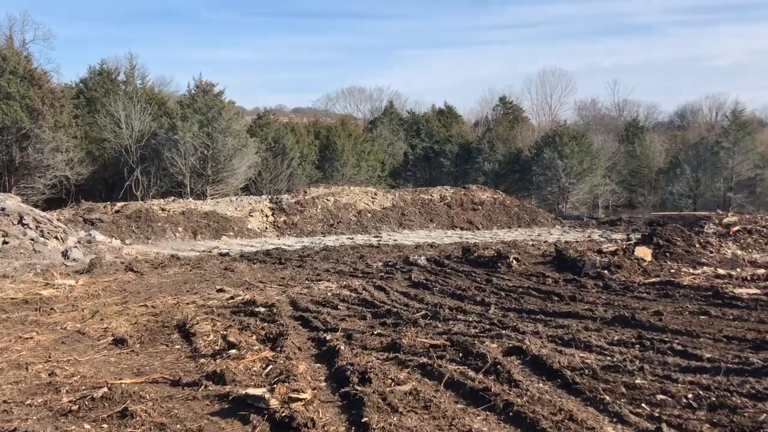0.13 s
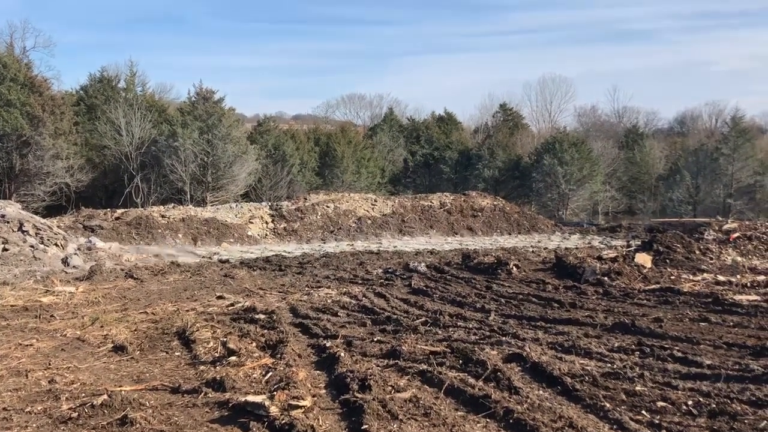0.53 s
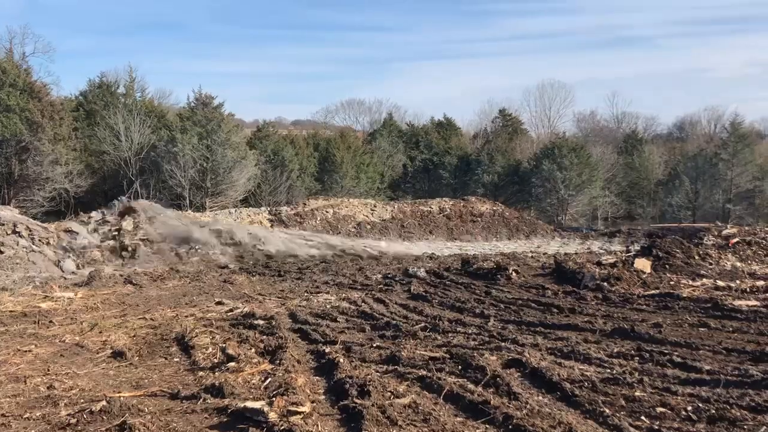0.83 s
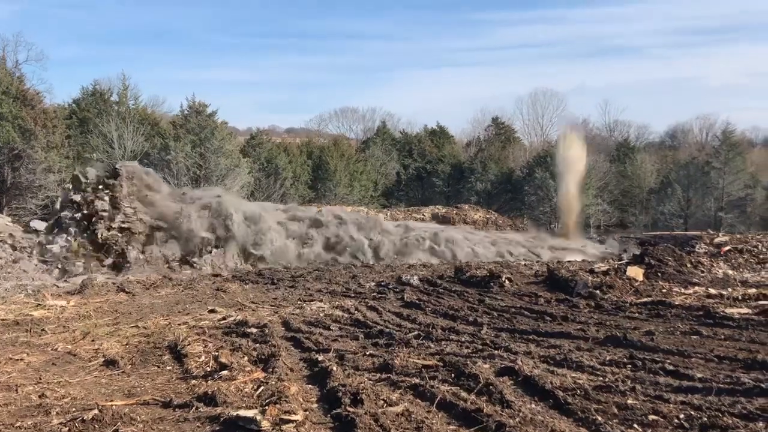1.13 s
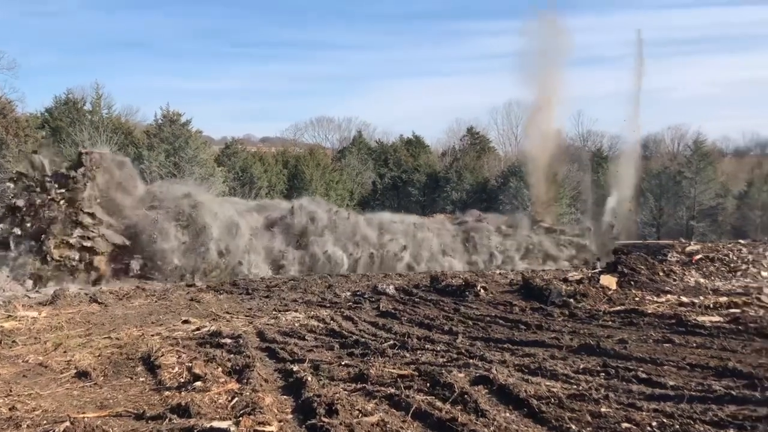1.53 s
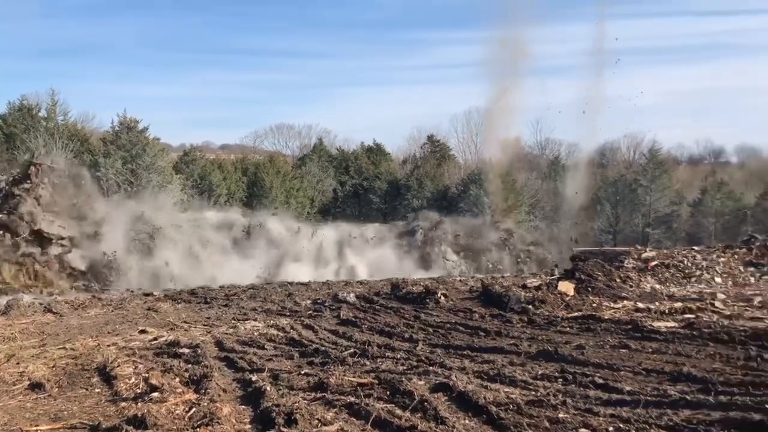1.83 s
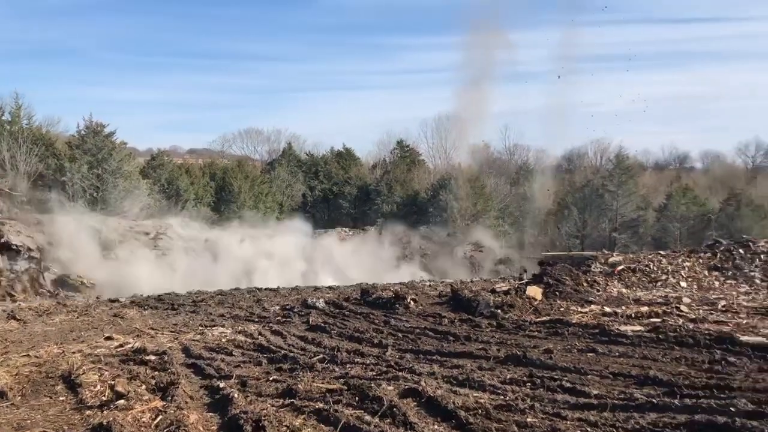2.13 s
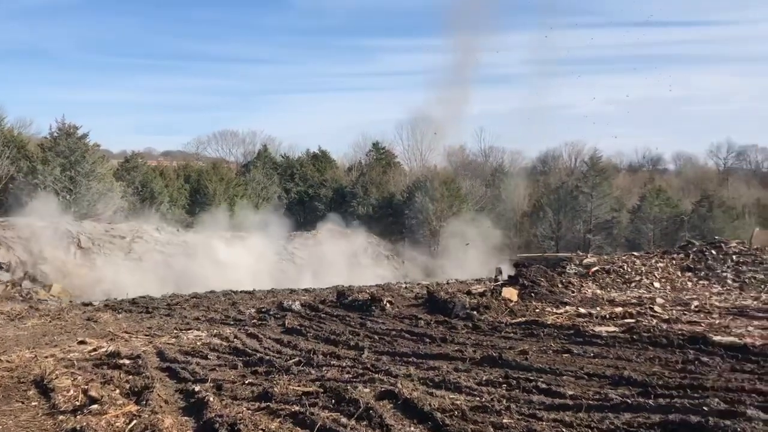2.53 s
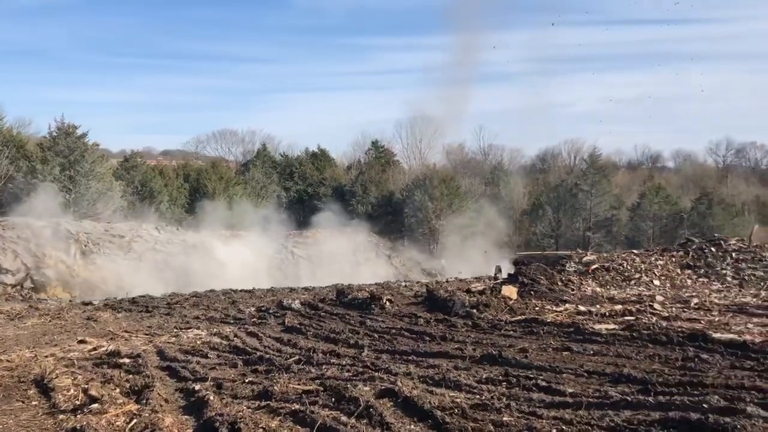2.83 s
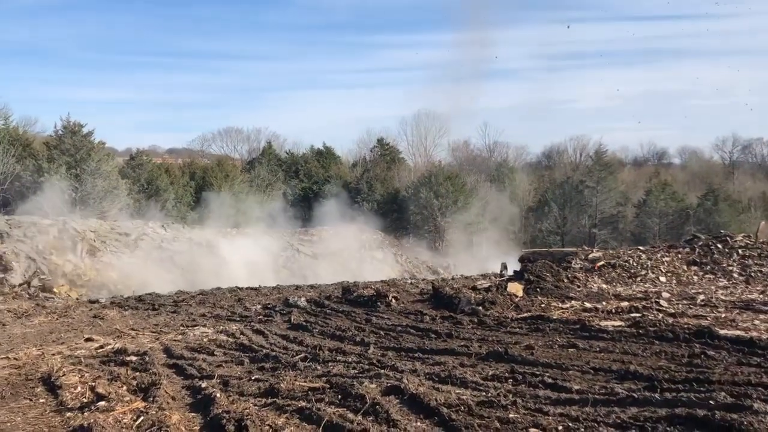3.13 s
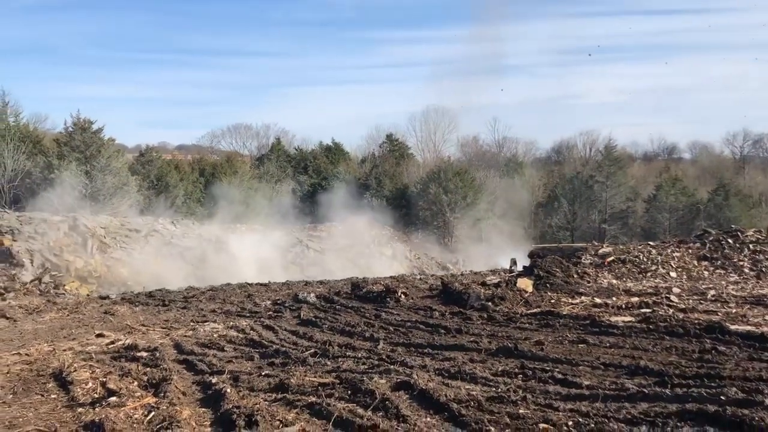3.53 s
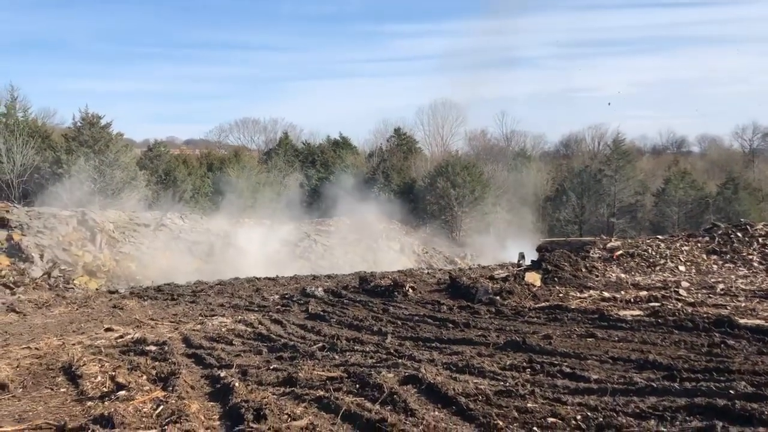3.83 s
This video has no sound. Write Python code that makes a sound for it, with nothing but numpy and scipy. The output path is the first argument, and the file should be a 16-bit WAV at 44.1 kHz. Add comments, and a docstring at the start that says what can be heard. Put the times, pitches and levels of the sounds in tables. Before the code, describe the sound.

Rock blasting outdoors: sharp crackling, a roll of low booms, then falling earth and stones.

```python
"""An open earth site during a rock blast, heard from afar on one microphone. A starter shot sets off a
run of surface detonators that crackle along the trench and scatter off banks and trees. The buried
charges follow as a roll of low booms, and some holes vent with a dull pop. Thrown rock and earth rain
down in a long rush that thins out to single stones, over a bed of still air."""
import sys
import numpy as np
from scipy import signal
from scipy.io import wavfile
from scipy.ndimage import uniform_filter1d

SR = 44100
rng = np.random.default_rng(int(sys.argv[2]) if len(sys.argv) > 2 else 0)


def persist_wave(psi):
    """Save psi, clipped to +-1, as 16-bit WAV."""
    counts = np.round(np.clip(psi, -1, 1) * 32767).astype(np.int16)
    wavfile.write(sys.argv[1], SR, np.atleast_2d(counts).T)


N = 176400

# surface detonators: t/s, relative level of the crack/dB, body above the crack/dB
DETONATORS = [(0.066, -35, 6), (0.078, -41, 11), (0.089, -5.5, 7.5), (0.114, -17, 4), (0.1245, -23, 11),
              (0.1487, -14.5, 10.5), (0.1631, -27, 17), (0.177, -14.5, -5), (0.1839, -11, 3.5),
              (0.2009, -13.5, 9.5), (0.2056, -11, 4), (0.2203, -11.5, 7), (0.2255, -16, 11.5),
              (0.239, -17, 10), (0.2431, -11.5, -4), (0.2537, -18.5, 14), (0.2562, -12, 3),
              (0.261, -15.5, 1), (0.2651, -18, 10), (0.2786, -17.5, 13), (0.2807, -13.5, 10),
              (0.2954, -11.5, 7), (0.2995, -15, 6.5), (0.3032, -20, -6), (0.316, -15, 10.5),
              (0.3203, -19, 0), (0.3265, -20, 8), (0.3307, -11, 4), (0.3352, -22, 6), (0.3413, -11.5, 3),
              (0.3579, -18.5, 10.5), (0.3626, -18.5, 5), (0.366, -11.5, -14), (0.3816, -18, 10.5),
              (0.3908, -14, 3), (0.4063, -18, 6), (0.4134, -16.5, 10), (0.4196, -18, 10), (0.4301, -19, 11),
              (0.4348, -13.5, 6), (0.456, -13.5, 8), (0.4608, -17, 6), (0.4753, -16, 7), (0.4785, -18, 7),
              (0.4866, -22.5, 16.5), (0.491, -20, 4), (0.4946, -11.5, -3), (0.5012, -22.5, 14),
              (0.511, -21.5, 15), (0.5152, -16, 7), (0.5306, -11.5, 1), (0.5337, -14, -21),
              (0.541, -19, -13), (0.5542, -13.5, -9), (0.558, -13, -4), (0.5702, -18, 7), (0.5753, -17, 6),
              (0.5822, -12, -7), (0.586, -15, 0), (0.5974, -11.5, 1), (0.6106, -14, -2), (0.6181, -17, 2),
              (0.6377, -11.5, 1), (0.6568, -16.5, 10), (0.6762, -10, 1), (0.699, -17, 6.5),
              (0.7054, -33, -6), (0.7182, -25.5, 14), (0.725, -16, 8), (0.7347, -14, -17),
              (0.7402, -18.5, 9), (0.765, -17.5, 8.5), (0.802, -19, -3), (0.8047, -13, -7),
              (0.8131, -20, 5), (0.8234, -16.5, -2), (0.8313, -20, -4), (0.8445, -29, 16.5),
              (0.854, -17, -6), (0.8655, -26, 15.5), (0.8902, -28.5, 12)]
# course of the rain of debris: t/s, relative level/dB, treble tilt/dB per two octaves
DEBRIS_FALL = [(.9, -41, -5), (1.15, -43.5, -1.5), (1.35, -42, 4.5), (1.62, -42.5, 0.5), (1.8, -33.5, -0.5),
               (2.15, -29, 0.5), (2.4, -31.5, -0.5), (2.7, -34, 0), (3.0, -38, -0.5), (3.3, -41.5, -1),
               (3.65, -43.5, 1), (3.75, -45.5, 0), (4, -49.5, 0.5)]


def amp(db):
    """Decibels to gain."""
    return 10 ** (np.asarray(db) / 20)


def rms_one(x):
    """Scale to unit rms."""
    return x / np.sqrt(np.mean(x ** 2) + 1e-20)


def at_hz(points, hz):
    """Read a table on a log-frequency axis."""
    f, v = np.transpose(points)
    return np.interp(np.log(hz), np.log(f), v)


def drift(rate_hz):
    """A slow random wander of unit spread."""
    pole = np.exp(-80 * np.pi * rate_hz / SR)
    slow = signal.lfilter([1], [1, -2 * pole, pole * pole], rng.standard_normal(N // 40 + 2002))[2000:]
    return np.interp(np.arange(N) / 40, np.arange(len(slow)), rms_one(slow))


def bands(spectrum, sources, gain=lambda hz: 1):
    """Colour two sources in alternate half-octave bands; gain(hz) shapes each band in time."""
    out, edges = 0, 20 * 2 ** np.arange(0, 9.8, .5)
    for k, (low, high) in enumerate(zip(edges, edges[1:])):
        hz = np.sqrt(low * high)
        if spectrum[0][0] < hz < spectrum[-1][0]:
            band = signal.butter(2, [low, high], "band", fs=SR, output="sos")
            out = out + amp(at_hz(spectrum, hz)) * gain(hz) * signal.sosfilt(band, sources[k % 2])
    return out


def add(out, s, sound):
    """Mix a sound in from time s."""
    i = max(int(s * SR), 0)
    out[i:i + len(sound)] += sound[:len(out) - i]


def decay(power, t60):
    """Power that dies away by 60 dB in t60 seconds."""
    return signal.lfilter([1], [1, -amp(-120 / (t60 * SR))], power)


def swing(length, s, db, hz, rise_s, fall_s, sag, phase):
    """A short swing of pressure that peaks at s and sags in pitch."""
    t = np.arange(length) / SR - s
    shape = np.exp(-.5 * (t / np.where(t < 0, rise_s, fall_s)) ** 2)
    return amp(db) * shape * np.cos(2 * np.pi * hz * t * (1 - sag * np.clip(t * hz, -1, 1)) + phase)


def swings(rows, rise_cycles, fall_cycles, sag):
    """One swing per row of t/s, level/dB, f/Hz, its length counted in cycles."""
    out, lead_s = np.zeros(N), 3000 / SR
    for (s, db, hz), phase in zip(rows, rng.uniform(-1.47, 1, len(rows))):
        add(out, s - lead_s, swing(6000, lead_s, db, hz, rise_cycles / hz, fall_cycles / hz, sag, phase))
    return out


def knocks(rows, cycles, rough, cut_hz):
    """One noisy ring per row of t/s, level/dB, f/Hz, down 60 dB after `cycles`, dulled by distance."""
    out, t = np.zeros(N), np.arange(2000) / SR
    attack = np.minimum(t / .0005, 1)
    for (s, db, hz), grit in zip(rows, rng.standard_normal((len(rows), len(t)))):
        ring = np.sin(2 * np.pi * hz * t) + rough * grit
        add(out, s - .001, amp(db - 60 * t * hz / cycles) * attack * ring)
    return signal.sosfilt(signal.butter(3, cut_hz, fs=SR, output="sos"), out)


def charges():
    """The buried charges go off as a roll of low booms with its own low echo."""
    # buried charges: t/s, relative level/dB, f/Hz
    shots = [(0.578, -12, 152), (0.593, -7, 135), (0.647, -8, 114), (0.675, -10, 138), (0.701, -4.5, 139),
             (0.732, -7.5, 188), (0.749, -6.5, 146), (0.773, -3, 195), (0.793, -7.5, 146), (0.83, -5, 118),
             (0.866, -12, 134), (0.885, -7, 89), (0.903, -4, 136), (0.917, -4.5, 101), (0.937, -5.5, 106),
             (0.969, -6, 151), (0.99, -7.5, 96), (1.015, -4.5, 142), (1.036, -11, 170), (1.063, -8, 100),
             (1.085, -15, 160), (1.102, -10, 156), (1.13, -7, 103), (1.153, -6.5, 169), (1.167, -13, 99),
             (1.191, -3, 99), (1.208, -20, 137), (1.246, -11, 165), (1.259, -14, 126), (1.276, -7.5, 101),
             (1.288, -2, 121), (1.306, -13.5, 84.5), (1.382, -11.5, 152), (1.395, -15, 129),
             (1.431, -23, 106),]
    booms = amp(2) * swings(shots, rise_cycles=.3, fall_cycles=.54, sag=.41)
    t, echo_t60_s = np.arange(SR) / SR, .41
    tail = rng.standard_normal(SR) * amp(-60 * t / echo_t60_s)
    echo = signal.fftconvolve(booms, tail / np.sqrt(np.sum(tail ** 2)))[:N]
    return booms + amp(-.5) * echo


def detonators():
    """Each is a sharp snap with grit behind it, then a body that slides down as the lows arrive later."""
    # colour of the crack: f/Hz, spectral level/dB
    crack_colour = [(1180, -16), (2000, -10), (2440, 3), (3320, 5), (8440, -5), (15500, -16)]
    grit_t60_s, body_t60_s = .004, .0097
    from_hz, to_hz, slide_s = 2600, 693, .00082
    cracks, bodies, t = np.zeros(N), np.zeros(N), np.arange(900) / SR
    snap = np.arange(len(t)) == 25
    grit_shape = .7 * amp(-60 * t / grit_t60_s) * np.minimum(t / .00048, 1)
    body_shape = amp(-60 * t / body_t60_s) * (1 - np.exp(-t / .0014))
    slide_hz = to_hz + (from_hz - to_hz) * np.exp(-t / slide_s)
    rows = list(DETONATORS) + small_snaps()
    for (s, db, body_db), (detune, phase) in zip(rows, rng.uniform(-.97, 1, (len(rows), 2))):
        add(cracks, s - .0007, amp(db + 7) * (snap + grit_shape * rng.standard_normal(len(t))))
        hz = slide_hz * (1 + .25 * detune)
        tone = np.sin(2 * np.pi * np.cumsum(hz) / SR + np.pi * phase)
        add(bodies, s - .0004, amp(db + body_db + 7.5) * body_shape * tone)
    coloured = bands(crack_colour, [cracks, -cracks])
    return coloured * np.std(cracks) / np.std(coloured) + bodies


def small_snaps(from_s=.17, to_s=.86, per_s=150, body_db=9):
    """Extra detonator rows: a random run of faint snaps along the firing line."""
    gap, size = rng.random((200, 2)).T
    times = from_s + np.cumsum((.3 + 1.4 * gap) / per_s)
    levels = -28.5 + 7 * (2 * size - 1)
    return [(s, db, body_db) for s, db in zip(times, levels) if s < to_s]


def starter_shot():
    """Low swings of pressure from the starter; the early ones come ahead through the ground."""
    # swings of the shot: t/s of the peak, level/dB, f/Hz, rise/s, fall/s
    pulses = [(0.088, -3.5, 400, 0.0017, 0.0018), (0.094, 1.5, 245, 0.002, 0.0036),
              (0.129, -14, 240, .003, 0.003), (0.137, -12, 340, 0.003, 0.004),
              (.079, -21, 300, 0.005, 0.003), (.053, -32, 200, .005, .006)]
    return sum(swing(N, *pulse, sag=.19, phase=0) for pulse in pulses)


def vents():
    """Some holes vent with a dull, rough pop."""
    # venting holes: t/s, level/dB, f/Hz
    pops = [(.768, -15, 420), (1.007, -23, 450), (1.2775, -13.5, 940), (1.292, -9, 650), (1.391, -16, 800)]
    return knocks(pops, cycles=6, rough=.88, cut_hz=1940)


def scatter():
    """The listed detonators come back off ground, banks and trees as noise that dies band by band."""
    # colour of the scatter: f/Hz, spectral level/dB
    echo_colour = [(35, -44), (60, -28), (81, -29), (112, -27), (187, 0), (433, -5), (486, -7.5),
                   (1170, -12.5), (2410, -17.5), (8470, -27), (15500, -32.5)]
    # decay off banks and trees: f/Hz, time to fall 60 dB/s
    echo_t60 = [(100, 1), (400, 0.5), (1500, 1), (5000, 0.54), (14000, 0.058)]
    s, db, _ = np.transpose(DETONATORS)
    power = np.zeros(N)
    power[((s + .002) * SR).astype(int)] = amp(2 * db)
    power = np.abs(uniform_filter1d(power, size=100)) + 1e-18
    near_db, near_cut_hz = 17, 6500   # quick scatter off the ground round each detonator
    near = amp(2 * near_db) * decay(power, t60=.014)
    dying = lambda hz: np.sqrt(decay(power, at_hz(echo_t60, hz))
                               + near / (1 + (hz / near_cut_hz) ** 2) ** 2)
    white = rng.standard_normal((2, N))
    steady_rms = np.std(bands(echo_colour, white[:, :SR // 2]))
    return amp(-16.5) * bands(echo_colour, white, dying) / steady_rms


def debris_rain():
    """Dense grains of falling grit blur into a rush that thins to a patter."""
    # colour of the rush: f/Hz, spectral level/dB
    rush_colour = [(210, -17), (350, -5.5), (726, -1), (811, 1), (1850, -5), (2200, -9), (3170, -8.5),
                   (4950, -16.5), (6280, -16), (15500, -37)]
    grain_share, thins_from_s, flicker_db = .12, 2.3, .83
    t = np.arange(N) / SR
    s, db, tilt = np.transpose(DEBRIS_FALL)
    level_db = np.interp(t, s, db) - 40 * np.clip(s[0] - t, 0, 1) / .16   # swells up to the first row
    treble = np.interp(t, s, tilt)
    patter_share = .35 * np.clip((t - thins_from_s) / 1.4, 0, 1)
    blur = np.sqrt(1 - grain_share) * rng.standard_normal((2, N))
    dense = blur + np.sqrt(grain_share) * grains(per_s=2500)
    grit = np.sqrt(1 - patter_share) * dense + np.sqrt(patter_share) * grains(per_s=200)
    sway = drift(3.4)   # common to all bands
    gain = lambda hz: amp(flicker_db * (sway + drift(45)) + treble * np.log2(hz / 2000) / 2)
    return amp(level_db + 2) * rms_one(bands(rush_colour, grit, gain))


def grains(per_s, spread_db=6.5, tick_t60_s=.0063):
    """Grit landing: two streams of random short ticks of widely spread size, with a third mixed into both."""
    sizes = amp(spread_db * np.minimum(rng.exponential(1, (3, N)), 3.2))
    hits = sizes * (rng.random((3, N)) < per_s / SR)
    ticks = signal.lfilter([1], [1, -amp(-60 / (tick_t60_s * SR))], hits) * rng.standard_normal((3, N))
    return rms_one(ticks[:2] + ticks[2])


def earth_slump():
    """Earth thuds back beneath the rain of debris as an uneven rumble."""
    # course of the slump: t/s, relative level/dB, bass tilt/dB per octave
    thuds = [(1.45, -37, 6), (1.65, -35.5, 3), (1.85, -33.5, 1.5), (2.05, -30.5, -3.5), (2.25, -36, -5),
             (2.6, -35.5, 3), (2.8, -42.5, -1.5), (3.1, -39.5, 4.5), (3.3, -42, 3), (3.6, -44, 6),
             (3.75, -54, -1), (4, -73, 5)]
    # colour of the rumble: f/Hz, spectral level/dB
    earth_colour = [(22, -24), (35, -7), (59, 6.5), (242, 4), (286, -0.5), (350, -17), (450, -31),
                    (600, -60)]
    t = np.arange(N) / SR
    s, db, tilt = np.transpose(thuds)
    bass = np.interp(t, s, tilt)
    gain = lambda hz: amp(2.4 * drift(7.9) - bass * np.log2(hz / 130))
    rumble = rms_one(bands(earth_colour, rng.standard_normal((2, N)), gain))
    onset = np.clip((t - s[0]) / .073 + 1, 0, 1)
    return amp(np.interp(t, s, db) + 4.5) * onset * rumble


def stones():
    """Single stones land with a short, gritty knock."""
    # stones that stand out: t/s, relative level/dB, f/Hz
    landings = [(1.945, -22, 1390), (2.063, -19.5, 970), (2.552, -24, 1324), (2.608, -21, 2900),
                (2.759, -19, 3220), (2.768, -25, 930), (2.838, -25, 1090), (2.887, -23.5, 880),
                (2.936, -23.5, 1900), (2.962, -24, 3100), (3.142, -22.5, 1610), (3.167, -28, 520),
                (3.248, -27, 3400), (3.481, -28, 1314), (3.546, -30.5, 650), (3.596, -26.5, 1850),
                (3.633, -29, 947), (3.734, -28, 947)]
    return amp(4) * knocks(landings + clatter(), cycles=16, rough=.53, cut_hz=4200)


def clatter(from_s=1.9, span_s=2, low_hz=450, high_hz=2600):
    """Extra stone rows: smaller ones land at random, their level following the rain of debris."""
    when, pitch, size = rng.random((90, 3)).T
    s = from_s + when * span_s
    rain_s, rain_db, _ = np.transpose(DEBRIS_FALL)
    db = np.interp(s, rain_s, rain_db) + 4 + 7.2 * (size - .5)
    return list(zip(s, db, low_hz * (high_hz / low_hz) ** pitch))


def boulders():
    """Heavy rocks land with a low thump."""
    # heavy rocks: t/s, level/dB, f/Hz
    landings = [(1.995, -22, 228), (2.052, -15, 243), (2.143, -26, 205), (2.998, -27.5, 274),
                (3.135, -33, 124), (3.545, -38, 204), (3.8, -32, 190)]
    return swings(landings, rise_cycles=1, fall_cycles=.93, sag=.031)


def still_air():
    """The air over the site: a faint, steady, low noise."""
    # colour of the air: f/Hz, spectral level/dB
    air_colour = [(18, -28), (30, 15), (296, -1), (448, -4), (645, -1), (1830, -19), (3230, -31.5),
                  (15000, -42.5)]
    return amp(-42.5) * rms_one(bands(air_colour, rng.standard_normal((2, N))))


def ground_dip(x, hz=425, q=8.4, depth=.43):
    """The ground's echo partly cancels a narrow band on the way to the microphone."""
    return x - depth * signal.lfilter(*signal.iirpeak(hz, q, fs=SR), x)


def scene():
    """All sources at one distant microphone."""
    rocks = stones() + boulders()
    blast = detonators() + scatter() + charges() + vents()
    fall = debris_rain() + earth_slump() + rocks
    return (starter_shot() + ground_dip(blast + fall) + still_air())[None]


def record(dry):
    """The microphone drops the deepest bass, a limiter rounds the crests, and the top is cut."""
    low_cut_hz, high_cut_hz = 54, 15900
    open_ceiling, limited_ceiling, trip_level, limit_s = 1.1, .52, .9, .012
    x = signal.sosfilt(signal.butter(2, low_cut_hz, "high", fs=SR, output="sos"), dry)
    # once a loud peak has passed, the ceiling sinks and stays down
    tripped = np.maximum.accumulate(np.abs(x) > trip_level, axis=1)
    pole = np.exp(-1 / (limit_s * SR))
    engaged = signal.lfilter([(1 - pole) ** 2], [1, -2 * pole, pole * pole], tripped * 1.)
    ceiling = open_ceiling - (open_ceiling - limited_ceiling) * engaged
    rounded = x / (1 + (x / ceiling) ** 4) ** .25
    return signal.sosfilt(signal.ellip(12, .5, 70, high_cut_hz, fs=SR, output="sos"), rounded)


dry = scene()
out = record(dry)
persist_wave(out)
```